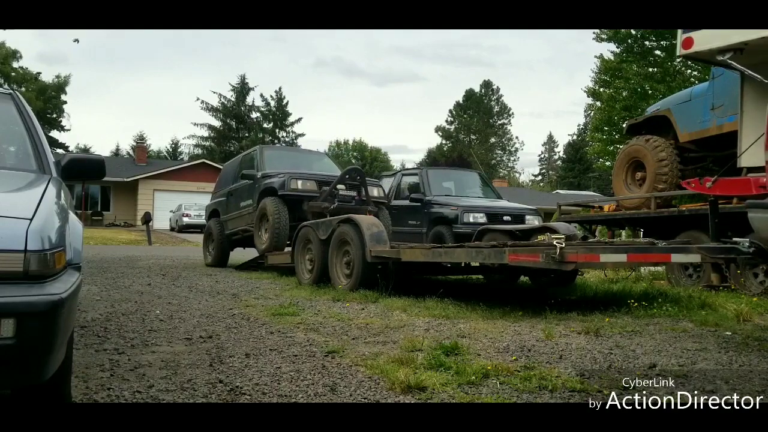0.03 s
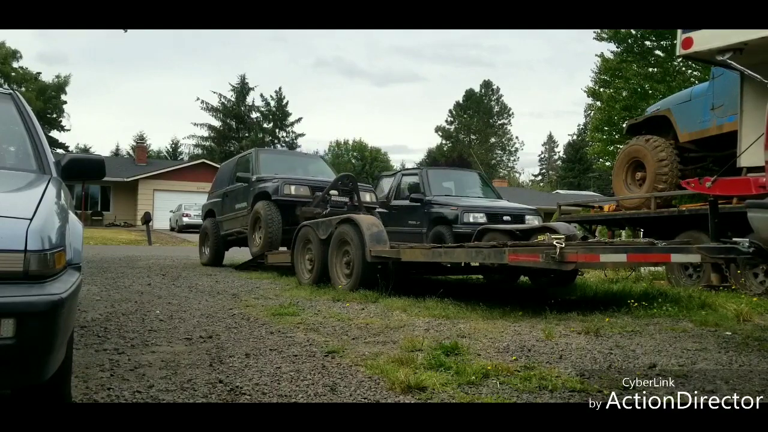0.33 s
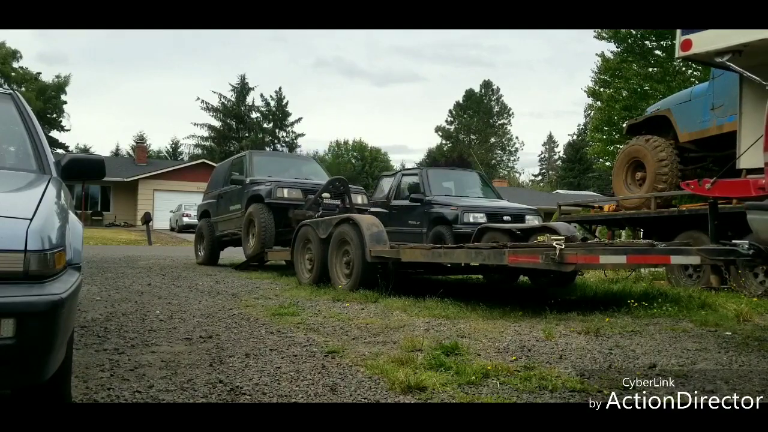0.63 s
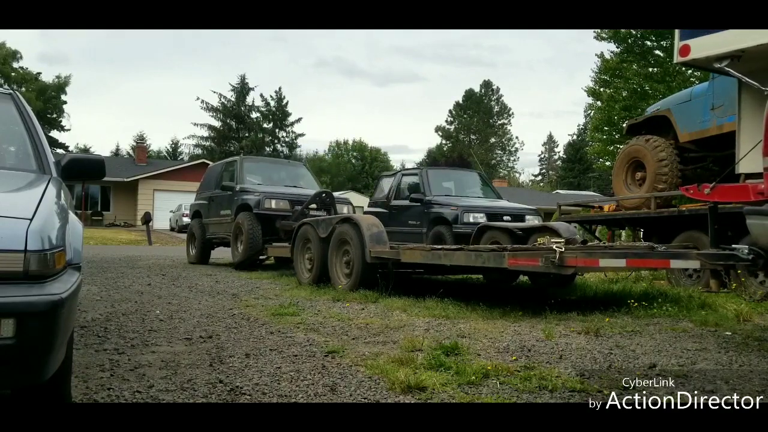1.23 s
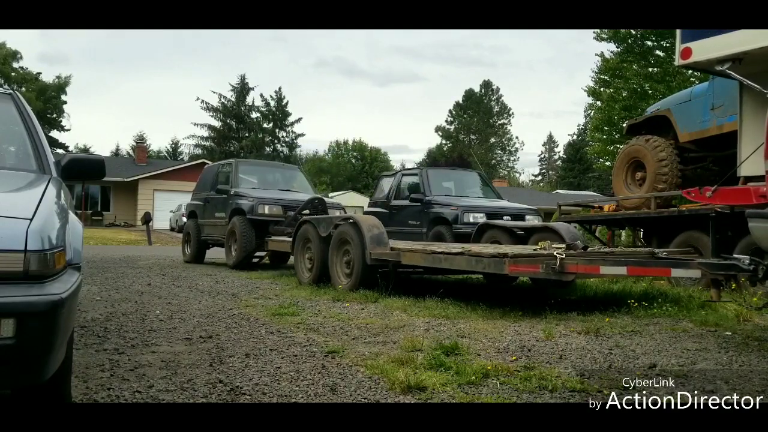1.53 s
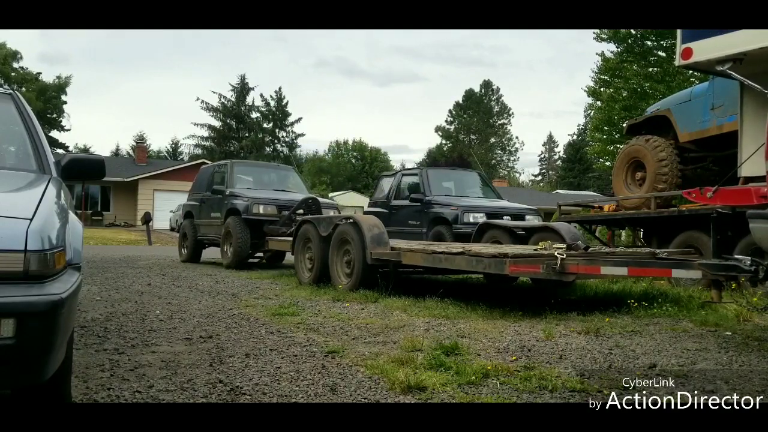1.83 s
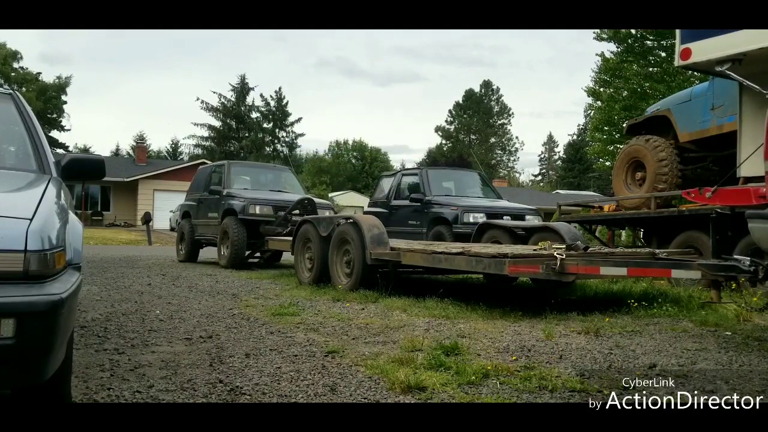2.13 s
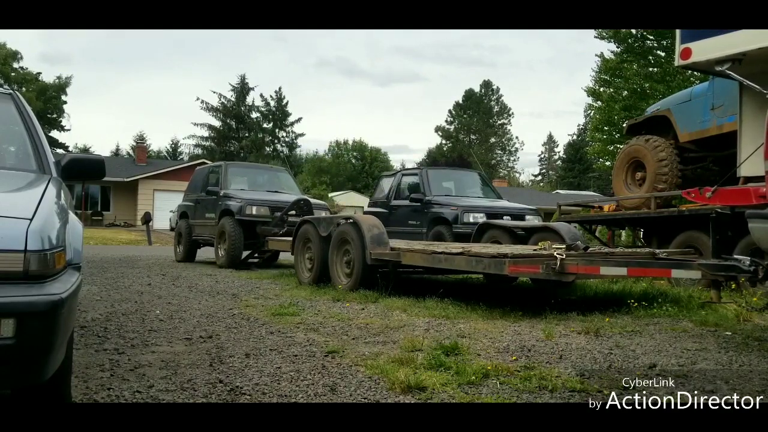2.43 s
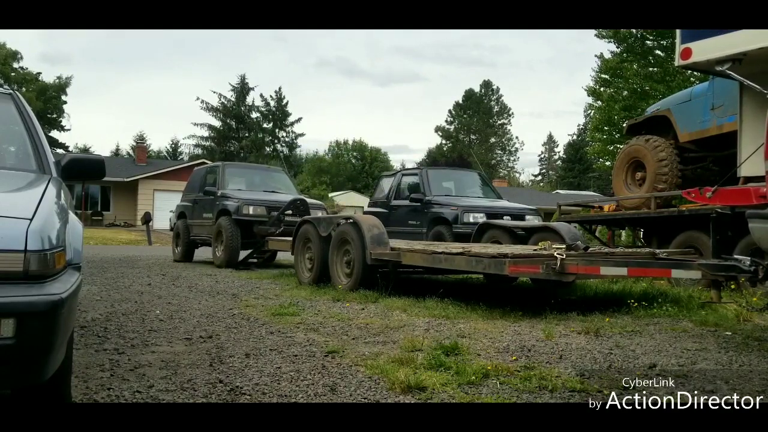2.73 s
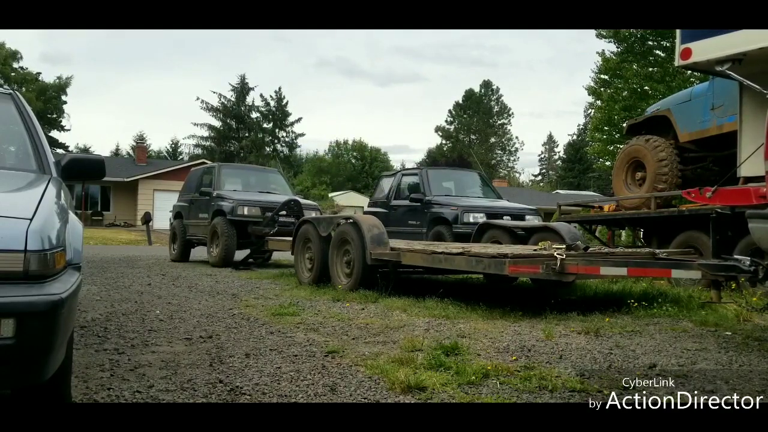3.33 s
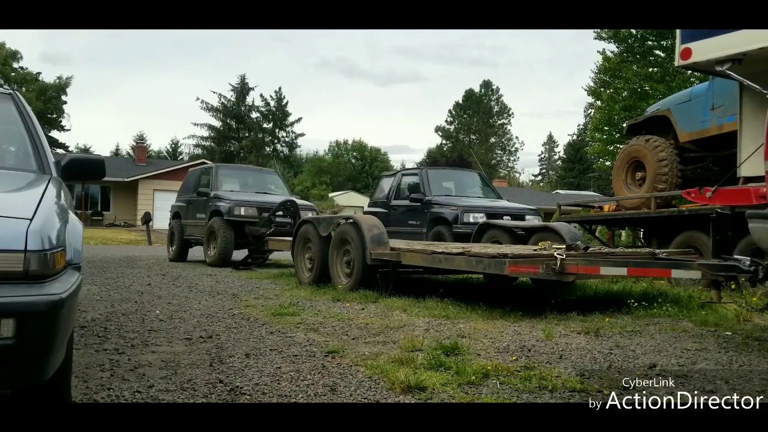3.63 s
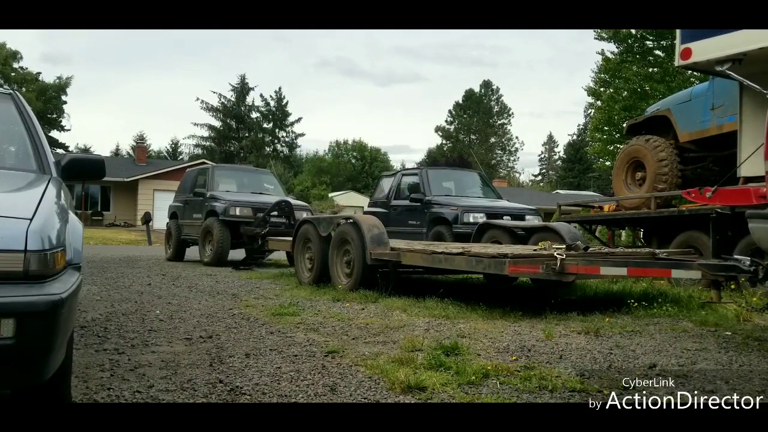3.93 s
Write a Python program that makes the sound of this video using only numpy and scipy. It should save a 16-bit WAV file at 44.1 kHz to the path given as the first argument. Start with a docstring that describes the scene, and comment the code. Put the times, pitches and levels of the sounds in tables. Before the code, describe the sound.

A small off-roader idles lumpily, backing off a steel trailer with one sharp clunk.

```python
"""A gravel yard: a small four-cylinder off-roader backs off a steel car trailer.
Its idle is lumpy, one cylinder misfiring; the firings ring the exhaust and puff gas over the whirr of
fan, belts and valve gear. The trailer knocks and creaks under the load and the tyres scrunch on grit.
As a wheel drops off, the steel clunks, rebounds and rattles. The engine settles, then picks up speed."""
import sys
import numpy as np
from scipy import signal
from scipy.fft import rfft, irfft
from scipy.io import wavfile
from scipy.ndimage import uniform_filter1d

SR = 44100
rng = np.random.default_rng(int(sys.argv[2]) if len(sys.argv) > 2 else 0)


def file_out(sig):
    """Save sig as 16-bit WAV at sys.argv[1]."""
    # one column per channel
    cols = np.atleast_2d(sig).T
    # limit, then scale
    lim = np.clip(cols, -1, 1)
    pcm = np.round(lim * 32767).astype(np.int16)
    wavfile.write(sys.argv[1], SR, pcm)


N = 176400
TIME_S, BIN_HZ = np.arange(N) / SR, np.arange(N // 2 + 1) * SR / N
LEFT_RIGHT = np.array([[1], [-1]])

# Crank speed. Each row: time in seconds, speed in rpm.
ENGINE_RPM = [(0, 1007), (1.25, 1007), (1.35, 991), (1.6, 985), (2.68, 988), (2.8, 968), (3.3, 965),
              (3.41, 976), (3.53, 1016), (3.64, 1111), (3.745, 1225), (3.84, 1260), (4, 1260)]
# Engine effort. Each row: time in seconds, firing gain in dB, machinery gain in dB.
EFFORT_DB = [(0, 0.5, 1.5), (.5, -1, 2), (1.1, -2, 0), (1.65, 0, 3), (2.0, -2, 2.5), (2.3, -2.5, -5),
             (2.8, -3.5, -6.5), (3.45, -1.5, -6.5), (3.65, -1.5, -2.5), (3.8, 3.5, -0.5), (4, -1, -2)]
# Cylinders in firing order. Each row: gain in dB under load, at idle, on the throttle.
CYLINDER_DB = [(6.5, 2.5, 0), (7.5, 3.5, 1.5), (5, -0.5, -2), (-42.5, -44.5, -13)]
# Exhaust resonances. Each row: frequency in Hz, width in Hz, relative level in dB.
PIPE_MODES = [(35.2, 6.9, -5.5), (53.9, 12.6, 0.5), (110.1, 18, 2.5), (127.8, 25.5, -3),
              (167.7, 10.4, -16.5), (307.2, 13.3, -24.5), (443, 15, -22)]
# Gas puffs. Each row: frequency in Hz, relative density in dB.
PUFF_SPECTRUM = [(70, -14), (130, 10), (200, -11.5), (260, 5), (320, 6), (380, -18), (460, -11),
                 (700, -13.5), (2000, -45)]
# Fan, belts and valve gear. Each row: frequency in Hz, relative density in dB.
MACHINERY_SPECTRUM = [(110, -11), (180, -1), (216, -10), (264, -14), (317, -3.5), (380, -22), (473, -6.5),
                      (644, -15.5), (831, -15.5), (1310, -23.5), (2310, -21.5), (2720, -29), (6630, -41),
                      (8410, -54.5), (14000, -47.5)]
# Blows as the wheel drops off. Each row: start in seconds, then thud, clang and crack in dB.
DROP_BLOWS = [(1.728, -16, -28.5, -30.5), (1.753, -10.5, -21, -15), (1.762, -15.5, -45, -23),
              (1.775, -24.5, -14.5, -43), (1.8, -24.5, -30, -34), (1.855, -23, -20, -28.5),
              (1.871, -25, -21.5, -27), (1.909, -29.5, -27, -29.5), (1.935, -36, -38, -36),
              (1.984, -38, -41, -41.5), (2.06, -31, -34.5, -42)]
# Knocks of the loaded deck. Each row: start in seconds, then thud, clang and crack in dB.
DECK_KNOCKS = [(.039, -62, -30, -38), (.264, -48, -33, -44), (0.433, -29, -34, -45), (.578, -30, -36, -56),
               (.824, -36, -31.5, -48), (1.594, -36, -33, -38), (2.657, -61, -39, -58),
               (2.896, -72, -40.5, -51.5), (3.162, -58, -44, -68), (3.565, -37.5, -32.5, -76),
               (3.77, -42, -32, -91), (3.829, -30.5, -33, -53), (3.951, -31, -32, -49)]
# Trailer frame resonances. Each row: frequency in Hz, gain in dB, T60 in seconds.
FRAME_MODES = [(88.9, -7.5, 0.55), (138.2, 5.5, 0.095), (169.5, -4.5, 0.4), (226.6, -8, 0.48),
               (307, -15.5, 0.93), (377.5, -17.5, 1), (457, -4, 0.2), (592, -10, 0.41), (712, -7, 0.48),
               (794, -8, 0.33), (974, 0.5, 0.21), (1137, -11.5, 0.29), (1680, -4, 0.12), (2280, -3.5, 0.17),
               (2480, -8.5, 0.14), (2720, -15.5, 0.12), (3040, -17.5, 0.14), (3300, -16.5, 0.06),
               (3560, -13.5, 0.15)]
# Dense ring of loose steel. Each row: frequency in Hz, gain in dB, T60 in seconds.
CLATTER_BANDS = [(69, -22.5, 0.62), (148, -4.5, 0.71), (357, -11, 0.77), (850, -2, 0.43),
                 (1460, -6.5, 0.61), (2320, 3, 0.15), (4080, -8.5, 0.3), (6500, -19, 0.28),
                 (12200, -35, 0.076)]
# Springs and chains. Each row: peak time in seconds, centre and width in Hz, decay in seconds,
# level in dB.
STEEL_CREAKS = [(0.045, 1550, 493, 0.057, -37), (.581, 870, 250, 0.0096, -42), (.78, 1950, 900, 0.18, -44),
                (1.21, 3470, 500, 0.035, -48), (1.734, 5340, 3980, .03, -37),
                (1.754, 11800, 895, 0.02, -45), (1.758, 2620, 350, 0.038, -22),
                (1.76, 8200, 4060, 0.019, -39), (2.187, 4180, 1480, 0.023, -54),
                (2.275, 2900, 298, 0.015, -57.5), (2.485, 4700, 900, 0.052, -62),
                (2.535, 3650, 600, 0.016, -58.5), (3.65, 2180, 147, 0.019, -57),
                (3.697, 2130, 148, 0.015, -54)]
# Tyre scrunches. Each row: peak time, rise and decay in seconds, level in dB, tilt in dB per octave.
TYRE_SCRUNCHES = [(0.057, .02, 0.062, -35.5, 0.5), (0.858, 0.077, 0.069, -37, 1),
                  (1.214, 0.032, 0.077, -43, 4), (1.28, 0.21, 0.069, -46, -1), (1.623, .04, 0.062, -38, 1)]
# Stones under the tread. Each row: frequency in Hz, relative density in dB.
GRAVEL_SPECTRUM = [(150, -4), (400, 9.5), (900, 3.5), (1400, 1.5), (2300, -2.5), (4000, -17.5),
                   (7000, -27.5), (10000, -35), (14000, -33)]
# Outdoor air. Each row: frequency in Hz, relative density in dB.
AIR_SPECTRUM = [(20, -34), (60, 22), (150, 14), (300, -43.5), (1000, -9.5), (3000, -22), (8000, -68),
                (14000, -30.5)]
# Stereo image. Each row: frequency in Hz, side minus mid in dB, left minus right in dB.
STEREO_IMAGE = [(41, -36.5, -9.5), (150, -17.5, -0.2), (360, -8.5, -3.5), (715, -6, 0), (1150, -3, -6),
                (2380, 3, -4), (5000, -2, -1.5), (7400, 5, 11.5), (12040, -0.5, -1.5)]

CYLINDER_1_FIRES_S, UNLOAD_S, THROTTLE_S = .0685, 1.4, 3.3
THUD_HZ, CLANG_HZ, CRACK_HZ = 231, 660, 2050
STEEL_ATTACK_S, STEEL_TAIL_S, KNOCK_T60_RATIO = 0.0012, 1.2, 0.33


def engine():
    """Four-stroke, two firings per turn, driving exhaust, puffs and machinery."""
    firing_count = np.cumsum(curve(ENGINE_RPM)) * 2 / 60 / SR
    firing_count -= firing_count[int(CYLINDER_1_FIRES_S * SR)]
    pulses = firing_pulses(firing_count)
    return exhaust(pulses) + gas_puffs(pulses) + machinery(firing_count)


def firing_pulses(firing_count, scatter_db=1.1):
    """One impulse per firing; the cylinders are uneven and the fourth misfires."""
    at = np.flatnonzero(np.diff(np.floor(firing_count))) + 1
    cylinder = np.floor(firing_count[at]).astype(int) % len(CYLINDER_DB)
    loaded, idle, revving = np.array(CYLINDER_DB, float)[cylinder].T
    cylinder_db = np.select([TIME_S[at] < UNLOAD_S, TIME_S[at] < THROTTLE_S], [loaded, idle], revving)
    pulses = np.zeros(N)
    pulses[at] = undb(cylinder_db + curve(EFFORT_DB)[at] + scatter_db * rng.standard_normal(len(at)))
    return pulses


def exhaust(pulses, level_db=-29.5, pan_db=-1.62, muffler_hz=550, tailpipe_hz=29.8):
    """Firings ring the pipe; the muffler cuts the treble, the tailpipe the deepest bass."""
    s = 1j * BIN_HZ
    pipe = sum((-1) ** k * undb(db) * width_hz * s / (s * s + width_hz * s + hz * hz)
               for k, (hz, width_hz, db) in enumerate(PIPE_MODES))
    pipe /= np.sqrt(1 + (BIN_HZ / muffler_hz) ** 8)
    pipe /= np.sqrt(1 + (tailpipe_hz / (BIN_HZ + 1)) ** 16)
    return unit(irfft(rfft(pulses) * pipe, N)) * undb(level_db) * pan(pan_db)


def gas_puffs(pulses, level_db=-52.5, decay_s=0.026, throttle_db=11.5):
    """Gas rushes out after each firing, harder on the throttle."""
    drive = pulses * undb(throttle_db * (TIME_S > THROTTLE_S))
    flow = unit(signal.lfilter([1], [1, -np.exp(-1 / (decay_s * SR))], drive))
    rush = stereo_spectrum(rng.standard_normal((2, N)) * flow)
    return unit(irfft(rush * undb(across(PUFF_SPECTRUM, BIN_HZ)), N)) * undb(level_db)


def machinery(firing_count, base_db=-43.5, throb_depth=0.31, decay_firings=0.081, flicker_db=.35):
    """Fan, belts and valve gear whirr, throbbing at each firing."""
    whirr = noise(undb(across(MACHINERY_SPECTRUM, BIN_HZ)) * bass_cut())
    throb = unit(1 + throb_depth * np.exp(-(firing_count % 1) / decay_firings))
    return whirr * throb * undb(base_db + curve(EFFORT_DB, column=2) + flicker_db * wander(rate_hz=25.17))


def trailer():
    """Free blows and damped knocks excite the loose steel and the frame."""
    hits = [(row, 1) for row in DROP_BLOWS] + [(row, KNOCK_T60_RATIO) for row in DECK_KNOCKS]
    t = np.arange(int(STEEL_TAIL_S * SR)) / SR
    attack = 1 - np.exp(-t / STEEL_ATTACK_S)
    return clatter(hits, t, attack) + frame_ring(hits, t, attack)


def hit_force(row, hz):
    """Strength of a hit at one frequency, from its thud, clang and crack."""
    return undb(across(list(zip((THUD_HZ, CLANG_HZ, CRACK_HZ), row[1:])), hz))


def clatter(hits, t, attack, gain_db=-2.5, yard_db=-39, yard_t60_s=1):
    """Loose steel rings as noise bands half an octave apart, dying away in the yard."""
    out = np.zeros((2, N))
    hiss = stereo_spectrum(rng.standard_normal((2, N)))
    yard_power = (undb(yard_db) * fade(t, yard_t60_s)) ** 2
    for hz in 62.5 * 2 ** np.arange(0, 8, .5):
        triangle = np.maximum(1 - 2 * abs(np.log2((BIN_HZ + 1) / hz)), 0)
        band = unit(irfft(hiss * triangle, N))
        t60_s = across(CLATTER_BANDS, hz, column=2)
        ring_power = {ratio: attack ** 2 * (fade(t, t60_s * ratio) ** 2 + yard_power)
                      for ratio in (1, KNOCK_T60_RATIO)}
        power = np.zeros(N + len(t))
        for row, ratio in hits:
            start = int(row[0] * SR)
            power[start:start + len(t)] += hit_force(row, hz) ** 2 * ring_power[ratio]
        out += band * np.sqrt(power[:N] / np.pi) * undb(gain_db + across(CLATTER_BANDS, hz))
    return out


def frame_ring(hits, t, attack, gain_db=-1.5, detune_ratio=0.0052):
    """Frame modes ring as damped sines, detuned as loose parts reseat at each hit."""
    out = np.zeros((2, N))
    for hz, db, t60_s in FRAME_MODES:
        envelope = {ratio: attack * fade(t, t60_s * ratio) for ratio in (1, KNOCK_T60_RATIO)}
        gain = pan(across(STEREO_IMAGE, hz, column=2)) * undb(gain_db + db)
        for row, ratio in hits:
            turn, lag, detune = rng.standard_normal(3)
            phase = 2 * np.pi * turn + LEFT_RIGHT * lag * undb(across(STEREO_IMAGE, hz))
            start = int(row[0] * SR)
            n = min(int(t60_s * ratio * SR), len(t), N - start)
            tone = np.sin(2 * np.pi * hz * (1 + detune_ratio * detune) * t[:n] + phase)
            out[:, start:start + n] += gain * hit_force(row, hz) * envelope[ratio][:n] * tone
    return out


def creaks(rise_s=0.0055):
    """Springs and chains rub and clink, each burst through one resonance."""
    out = 0
    for peak_s, hz, width_hz, decay_s, db in STEEL_CREAKS:
        resonance = 1 / (1 + (2 * (BIN_HZ - hz) / width_hz) ** 2)
        out += noise(resonance) * undb(db) * swell(peak_s, rise_s, decay_s)
    return out


def tyres(grains_per_s=3000, spread_db=0.5):
    """Dense grains of grit swell briefly as the tread rolls over them."""
    grains = (rng.random((2, N)) < grains_per_s / SR) * rng.standard_normal((2, N))
    grains *= undb(spread_db * np.minimum(rng.exponential(size=(2, N)), 4))
    grit = stereo_spectrum(grains) * undb(across(GRAVEL_SPECTRUM, BIN_HZ)) * bass_cut()
    octaves = np.log2(np.clip(BIN_HZ, 300, 6000) / 1000)
    out = 0
    for peak_s, rise_s, decay_s, db, db_per_octave in TYRE_SCRUNCHES:
        scrunch = unit(irfft(grit * undb(db_per_octave * octaves), N))
        out += scrunch * undb(db) * swell(peak_s, rise_s, decay_s)
    return out


def air(level_db=-45.5):
    """Steady outdoor rumble and faint hiss."""
    return noise(undb(across(AIR_SPECTRUM, BIN_HZ))) * undb(level_db)


def undb(db):
    """Decibels to gain."""
    return 10 ** (np.asarray(db) / 20)


def unit(x):
    """Scale to rms 1."""
    return x / np.sqrt(np.mean(x ** 2))


def curve(table, column=1):
    """Table column over time."""
    rows = np.array(table, float)
    return np.interp(TIME_S, rows[:, 0], rows[:, column])


def across(table, hz, column=1):
    """Table column over log frequency."""
    rows = np.array(table, float)
    return np.interp(np.log(np.maximum(hz, 1)), np.log(rows[:, 0]), rows[:, column])


def fade(t, t60_s):
    """Decay of 60 dB in t60_s."""
    return np.exp(-np.log(1000) * t / t60_s)


def swell(peak_s, rise_s, decay_s):
    """Exponential rise and fall."""
    return np.exp(-np.maximum((peak_s - TIME_S) / rise_s, (TIME_S - peak_s) / decay_s))


def wander(rate_hz):
    """Slow random drift, rms 1."""
    step = int(SR / rate_hz)
    return unit(uniform_filter1d(np.repeat(rng.standard_normal(N // step + 1), step), step)[:N])


def bass_cut(corner_hz=150):
    """First-order high-pass gain per bin."""
    return BIN_HZ / np.hypot(BIN_HZ, corner_hz)


def pan(db):
    """Channel gains for a left-minus-right level."""
    return undb(LEFT_RIGHT * db / 2)


def stereo_spectrum(pair):
    """Two unrelated signals to left and right spectra: narrow bass, wide treble."""
    mid, side = rfft(pair)
    width = undb(across(STEREO_IMAGE, BIN_HZ))
    balance = pan(across(STEREO_IMAGE, BIN_HZ, column=2))
    return (mid + LEFT_RIGHT * width * side) / np.hypot(1, width) * balance


def noise(colour):
    """Coloured stereo noise, rms 1."""
    return unit(irfft(stereo_spectrum(rng.standard_normal((2, N))) * colour, N))


def scene():
    """Engine, trailer and tyres in the open air."""
    return engine() + trailer() + creaks() + tyres() + air()


def record(dry):
    """Soft peak limit, then a steep low-pass."""
    ceiling, top_hz = 3.2, 14300
    low_pass = signal.ellip(10, .2, 80, top_hz, fs=SR, output="sos")
    return signal.sosfilt(low_pass, ceiling * np.tanh(dry / ceiling))


dry = scene()
out = record(dry)
file_out(out)
```